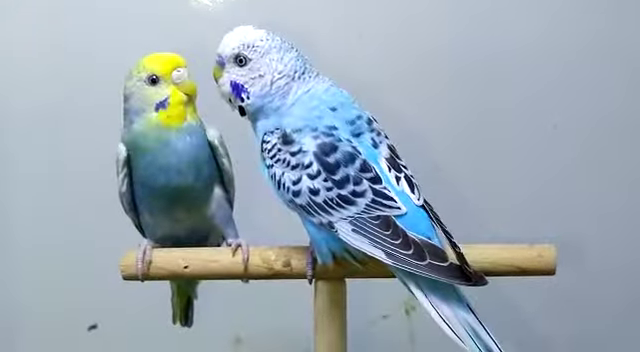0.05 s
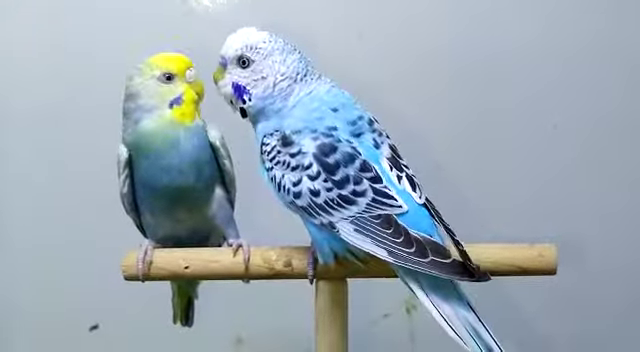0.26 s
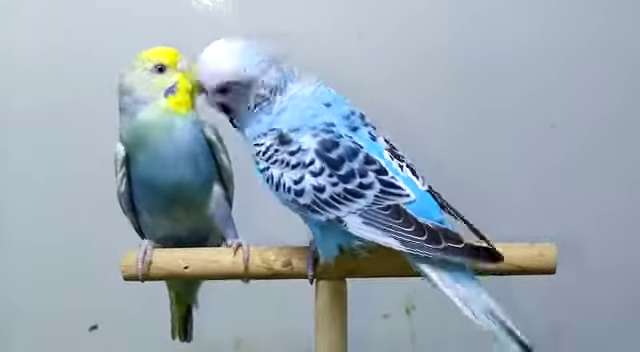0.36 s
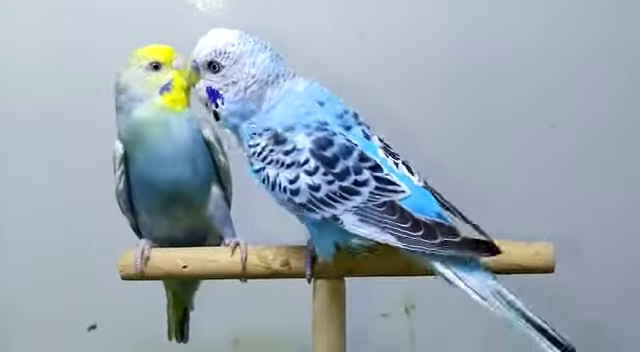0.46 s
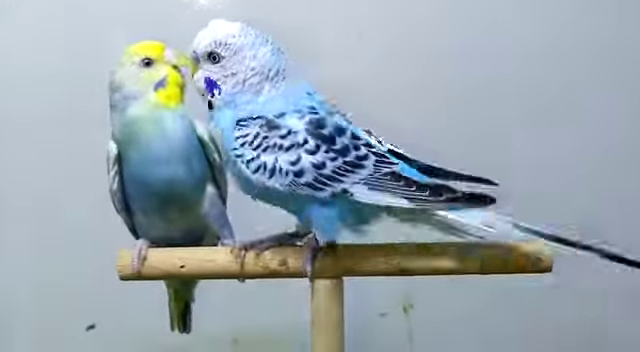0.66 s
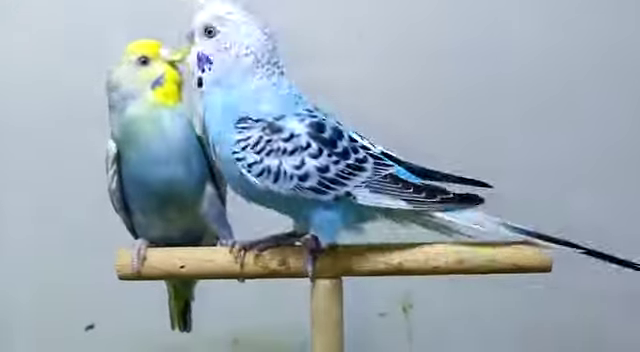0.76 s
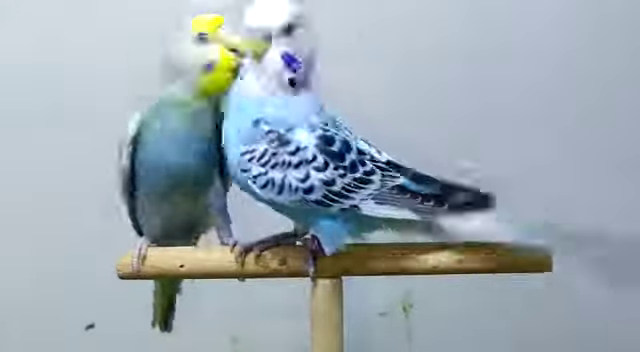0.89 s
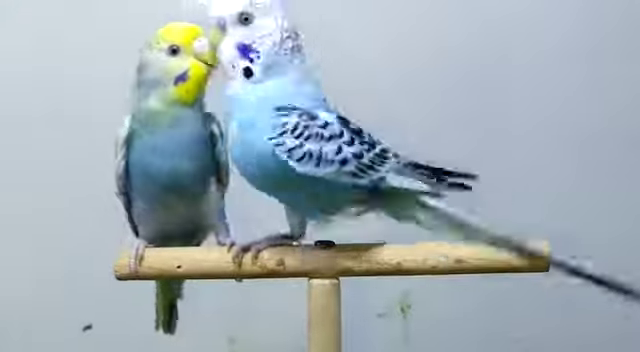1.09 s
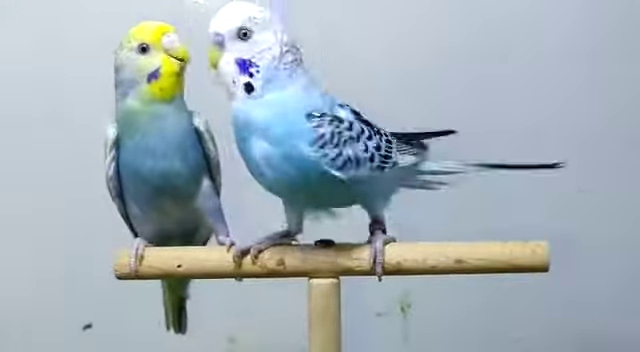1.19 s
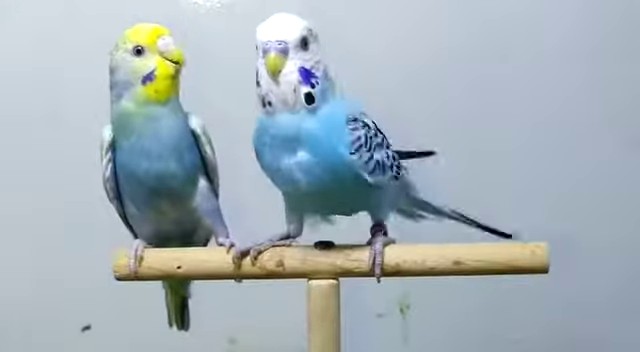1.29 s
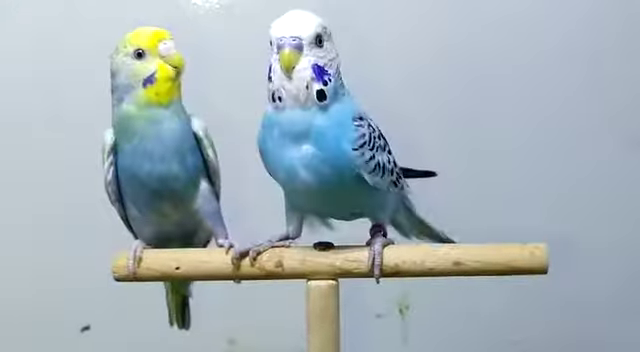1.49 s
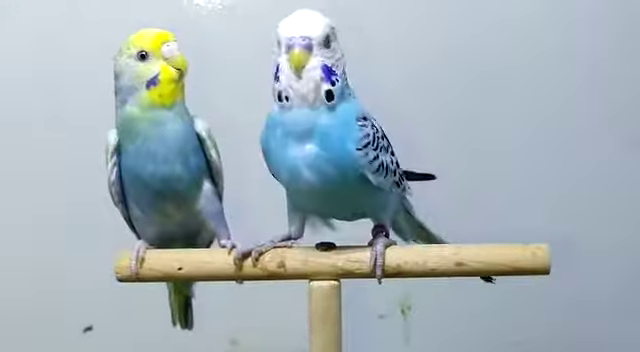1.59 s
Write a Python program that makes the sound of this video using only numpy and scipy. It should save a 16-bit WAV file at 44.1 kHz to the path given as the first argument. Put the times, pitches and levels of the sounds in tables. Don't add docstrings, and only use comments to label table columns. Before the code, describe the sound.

A budgerigar gives one short, loud, raspy warble up close, over low uneven wind-like rumble

```python
import sys
import numpy as np
from scipy import signal
from scipy.fft import rfft, irfft
from scipy.io import wavfile
from scipy.ndimage import uniform_filter1d

SR = 44100
rng = np.random.default_rng(int(sys.argv[2]) if len(sys.argv) > 2 else 0)


def boost_factor(decibels):
    exponent = np.asarray(decibels, float) / 20
    return 10 ** exponent


def wav_out(sig):
    wavfile.write(sys.argv[1], SR, np.round(np.clip(np.atleast_2d(sig).T, -1, 1) * 32767).astype(np.int16))


N = 72765
LEAD = SR // 4
M = N + LEAD


def slow(rate_hz):
    lowpass = signal.butter(2, rate_hz, fs=SR, output="sos")
    drift = signal.sosfilt(lowpass, rng.standard_normal(M + SR))[SR:]
    return drift / drift.std()


def at_hz(points, hz):
    p = np.array(points, float)
    return np.interp(np.log(np.maximum(hz, 1)), np.log(p[:, 0]), p[:, 1])


def coloured(x, points):
    return irfft(rfft(x) * boost_factor(at_hz(points, np.arange(M // 2 + 1) * SR / M)), M)


def noise(spectrum):
    hz = np.arange(N // 2 + 1) * SR / N
    x = irfft(rfft(rng.standard_normal((2, N))) * boost_factor(at_hz(spectrum, hz)), N)
    return x / x.std()


def pan(x, left_right_db):
    return x * boost_factor(np.array([[.5], [-.5]]) * left_right_db)


def voice(notes, voicing, attack_s, rasp_hz):
    flutter_hz, flutter_db, wobble = 150, 4, 0.012
    upper_fall_db, rasp_db = -19.5, -7.5
    swell_s, release_s = .003, 0.00081
    out, t = np.zeros((2, M)), (np.arange(M) - LEAD) / SR
    shake, flutter = slow(900), boost_factor(flutter_db * slow(flutter_hz))
    rasp_band = signal.butter(2, rasp_hz, "band", fs=SR, output="sos")
    rasp = signal.sosfilt(rasp_band, rng.standard_normal(M))
    for (start, length, hz0, hz1, db), (second_db, third_db, rough, pan_db) in zip(notes, voicing):
        on = slice(int((start - .01) * SR) + LEAD, int((start + length + .03) * SR) + LEAD)
        u, rough = t[on] - start, np.clip(rough, 0, 1)
        glide = np.interp(u, [0, length], [hz0, hz1])
        phase = 2 * np.pi * np.cumsum(glide * (1 + (wobble + 0.16 * rough ** 2) * shake[on])) / SR
        levels = [0, second_db, third_db, third_db + upper_fall_db, third_db + 2 * upper_fall_db]
        tone = np.zeros(len(u))
        for k, harmonic_db in enumerate(levels, 1):
            if k * hz0 < .36 * SR:
                tone += boost_factor(harmonic_db) * np.sin(k * phase)
        breath = rough * boost_factor(rasp_db + max(levels)) * rasp[on] * (1 + np.sin(phase))
        before = 0.38 * np.exp(np.minimum(u, 0) / swell_s)
        shape = np.where(u < 0, before, np.minimum(u / attack_s + 0.54, 1))
        shape = shape * np.exp(-np.maximum(u - length, 0) / release_s)
        out[:, on] += pan(np.sqrt(2) * boost_factor(db) * (tone * flutter[on] + breath) * shape, pan_db)
    return out


def near_warble():
    # start_s, length_s, start_pitch_hz, end_pitch_hz, level_db
    warble = [(.392, 0.015, 2761, 2801, -16), (.404, 0.0086, 2830, 3120, -21.5),
              (.412, 0.016, 3122, 3283, -20.5), (.428, 0.0065, 3350, 3520, -9.5),
              (.436, 0.005, 3880, 3750, -9), (.441, 0.014, 3460, 3305, -10), (.442, 0.012, 4490, 4400, -28),
              (.444, 0.011, 4030, 4230, -17.5), (.456, 0.015, 2755, 2890, -8.5),
              (.468, .013, 2808, 2624, -10.5), (.478, 0.0077, 4200, 3606, -16.5),
              (.479, 0.014, 4420, 4600, -29.5), (.483, 0.0074, 1908, 1704, -19),
              (.491, .01, 1759, 1810, -19.5), (.501, .015, 2614, 3052, -14.5),
              (.517, 0.022, 3160, 3182, -5), (.536, 0.0082, 3260, 3470, -8.5),
              (.547, 0.011, 3344, 3270, -4), (.55, 0.012, 4000, 4265, -16)]
    # second_harmonic_db, third_harmonic_db, roughness (0-1), left_right_db
    timbre = [(15.5, 5.5, .08, -8), (18.5, 14.5, .15, 0.5), (6, 0.5, 0.3, 7), (-17, -24, 0.6, 0),
              (6, -33, 0.6, -4.5), (-17.5, -33, 0.5, -1.5), (13, -31.5, 0.8, 2.5), (-4, -30, 0.5, 5.5),
              (-1, -16, 0.4, -1.5), (0.5, -3, 0.4, 2), (-11.5, -22.5, .55, -1.5), (15.5, -30, .35, -2.5),
              (9.5, -25.5, 0.33, 3), (10.5, -26.5, 0.3, 4), (-6.5, -7, 0.4, -1), (-17.5, -10.5, 0, -2.5),
              (-18.5, -11, 0.3, -4), (-15, -19, .55, 1), (-2.5, -28.5, 0.7, 2.5)]
    return voice(warble, timbre, attack_s=0.0024, rasp_hz=[1800, 14000])


def far_calls():
    # start_s, length_s, start_pitch_hz, end_pitch_hz, level_db
    calls = [(-.09, 0.094, 4360, 4830, -39.5), (-.06, 0.081, 1918, 3352, -43), (.09, 0.14, 1980, 2852, -49),
             (.13, 0.08, 3149, 3289, -41.5), (.195, 0.041, 2202, 1841, -44.5),
             (.795, 0.0568, 8350, 8790, -46.5), (.96, 0.047, 1100, 1416, -56),
             (1.061, 0.014, 1402, 1460, -44.5), (1.075, 0.043, 1624, 1703, -46),
             (1.14, 0.03, 1900, 2158, -48.5), (1.145, 0.069, 2910, 2977, -50.5),
             (1.19, 0.0717, 2248, 2298, -49.5), (1.27, 0.077, 2326, 2411, -52.5),
             (1.43, .03, 3900, 3626, -53.5), (1.452, .036, 3637, 3118, -39.5),
             (1.5, 0.054, 3500, 3060, -44), (1.55, 0.12, 2720, 2083, -47)]
    # second_harmonic_db, third_harmonic_db, roughness (0-1), left_right_db
    timbre = [(-32, -21, 0.8, -1.5), (-6.5, 7, 0.09, 0.5), (-22.5, -28.5, 0.5, 0), (-35, -32.5, 0.4, -3),
              (-24, -31, 0, 3), (-40, -40, 0.29, 4), (-36, -33, 0.91, 1), (-48, -18, 0.04, 5),
              (-35.5, -20.5, 0.08, 4), (-12, -19.5, 0.34, 10), (-37, -28, 0.34, 0.5), (-24, -17.5, 0.39, 5),
              (-16, -28.5, 0.24, 0.5), (-5, -29, 0.77, 3), (-14, -14.5, 0.35, -3), (-13, -12.5, .6, -2),
              (-14, -4, 0.8, 2)]
    # low_hz, high_hz
    rasp_band_hz = [1900, 4700]
    return voice(calls, timbre, attack_s=.008, rasp_hz=rasp_band_hz)


def ring(clicks, hz, t60_s):
    r, w = boost_factor(-60 / (t60_s * SR)), 2 * np.pi * hz / SR
    return signal.lfilter([0, np.sin(w)], [1, -2 * r * np.cos(w), r * r], clicks + 1e-18)


def claws():
    # start_s, tick_peak_db, hollow_knock_db
    touches = [
        (.311, -36.5, -73),
        (.647, -52, -36),
        (0.951, -46, -62),
        (0.971, -42, -55),
        (.998, -50.5, -64),
        (1.025, -46, -54.5),
        (1.122, -34, -73),
        (1.168, -37, -37.5),
        (1.21, -47, -46),
    ]
    # mode_hz, level_db, t60_s
    perch_modes = [(487, 1.5, 0.13), (875, 6, 0.035), (1100, -2.5, .025), (650, 4.5, .03)]
    tick_s, tick_hz = 0.0031, 4970
    claw_hz, claw_db, claw_t60_s = 12830, -4.5, 0.026
    out, t = np.zeros(M), (np.arange(M) - LEAD) / SR
    highpass = signal.butter(2, tick_hz, "high", fs=SR, output="sos")
    hiss = signal.sosfilt(highpass, rng.standard_normal(M))
    for start, tick_db, knock_db in touches:
        click = np.arange(M) == int(start * SR) + LEAD
        out += boost_factor(tick_db) * hiss * (t >= start) * np.exp(-np.maximum(t - start, 0) / tick_s)
        out += ring(boost_factor(tick_db + claw_db) * click, claw_hz, claw_t60_s)
        for hz, db, t60_s in perch_modes:
            out += boost_factor(db) * ring(boost_factor(knock_db) * click, hz, t60_s)
    return out


def ports(x):
    # frequency_hz, left_right_db
    balance = [(1800, 6.5), (2800, -2), (3200, -8.5), (3500, -11.5), (4000, 3), (5500, 10.5), (6400, 4.5),
               (8000, 6.5), (9500, -1.5)]
    left_leads_s = 0.0004753
    hz = np.arange(M // 2 + 1) * SR / M
    delay = np.exp(-2j * np.pi * hz * np.array([[0], [left_leads_s]]))
    return irfft(pan(rfft(x), at_hz(balance, hz)) * delay, M)


def room(x):
    # frequency_hz, t60_s
    decay = [(500, 0.81), (3000, 0.7), (8000, 0.66), (10000, 0.73), (11500, 0.06)]
    dip_hz, dip_db, dip_width_hz = 5550, -7, 400
    t, tail = np.arange(SR) / SR, 0
    edges_hz = 280 * 2. ** np.arange(0, 6.1, .5)
    white = rng.standard_normal((2, 2, SR))
    for k, (low, high) in enumerate(zip(edges_hz, edges_hz[1:])):
        bandpass = signal.butter(2, [low, high], "band", fs=SR, output="sos")
        t60_s = at_hz(decay, np.sqrt(low * high))
        tail = tail + signal.sosfilt(bandpass, white[k % 2]) * boost_factor(-60 * t / t60_s)
    dip = np.exp(-((np.arange(SR // 2 + 1) - dip_hz) / dip_width_hz) ** 2)
    onset = np.clip(t / 0.0027 - .3, 0, 1)
    tail = irfft(rfft(tail) * boost_factor(dip_db * dip), SR) * onset
    return signal.fftconvolve(x, tail / np.sqrt(np.sum(tail ** 2) / 2), axes=1)[:, :M]


def feathers():
    # time_s, level_db
    movement = [(0.299, -103), (0.318, -55), (.39, -54), (.42, -77), (.78, -60), (0.822, -41.5), (.93, -47),
                (1.12, -47), (1.2, -46), (1.3, -61.5), (1.4, -100)]
    # frequency_hz, density_db (dB per Hz)
    plumage = [(3500, -32), (6000, -21), (6700, -17), (7400, -20), (8600, -1), (10200, -14.5), (12300, -14),
               (16000, -22.5)]
    level_db = np.interp(np.arange(N) / SR, *np.transpose(movement))
    return noise(plumage) * boost_factor(level_db + 2.0 * slow(40)[:N])


def draught():
    # time_s, level_db, left_right_db
    strength = [(0.0, -38, 16), (0.214, -22, 15.5), (0.258, -33, 8), (0.436, -17, 31), (0.472, -20.5, 21),
                (0.52, -7, 27), (0.641, -41, 0), (0.89, -32, 0), (1.034, -36.5, -27), (1.118, -24.5, 19.5),
                (1.308, -25, 10), (1.368, -20, 31), (1.413, -35, 10.5), (1.626, -30, 10.5),
                (1.65, -28.5, 8)]
    # frequency_hz, density_db (dB per Hz)
    buffet = [(12, -50), (20, -48.5), (74, -0.5), (146, -2), (186, -6.5), (315, -18.5), (412, -27),
              (687, -54.5), (900, -75), (1170, -59), (1980, -120)]
    # time_s, peak_db, pitch_hz
    gusts = [(0.123, -7.5, 139), (0.152, -14, 106), (0.203, -4, 150), (0.231, -15, 150), (0.301, -16, 117),
             (0.342, -10, 150), (0.373, -26, 150), (0.428, 9, 161.3), (0.453, -4.5, 132),
             (0.497, -3.5, 203.7), (0.52, -25, 128.7), (0.542, -9, 115.2), (0.872, -9, 150),
             (0.917, -12.5, 192.3), (1.127, -9.5, 128.7), (1.153, -10.5, 88), (1.216, -14, 165),
             (1.276, -9.5, 95), (1.314, -20.5, 150), (1.367, -5, 160), (1.388, -10.5, 116),
             (1.498, -13.5, 119.3), (1.529, -8, 132), (1.577, -13, 118.5), (1.615, -7.5, 191),
             (1.642, -44, 149),
             (0.796, -16.5, 150),
        (1.291, -13, 134),
        (1.352, -4.5, 150),
        (1.436, -12.5, 138),
    ]
    lump_db, lumps_hz, trim_db = 3.0, 24.7, -1
    gust_cycles, gust_trim_db = 0.6, 0.5
    ceiling = .8
    t, (time_s, db, pan_db) = np.arange(N) / SR, np.transpose(strength)
    left_db = np.interp(t, time_s, db - 10 * np.log10(.25 + .25 * boost_factor(-2 * pan_db)))
    right_db = left_db - np.interp(t, time_s, pan_db)
    lumps = lump_db * np.array([slow(lumps_hz)[:N], slow(lumps_hz)[:N]])
    out = noise(buffet) * boost_factor(np.array([left_db, right_db]) + lumps + trim_db)
    for peak_s, peak_db, hz in gusts:
        u = (t - peak_s) * hz
        swell = np.exp(-np.abs(u / gust_cycles) ** 2)
        out[0] -= boost_factor(peak_db + gust_trim_db) * np.cos(2 * np.pi * u) * swell
    return ceiling * np.tanh(out / ceiling)


def hush():
    # frequency_hz, density_db (dB per Hz)
    floor_colour = [(180, -37.5), (300, -5), (814, -14.5), (2930, -13), (3760, -35), (8790, -6),
                    (11100, -34), (13000, -23), (16000, -20)]
    return boost_factor(-51) * noise(floor_colour)


def scene():
    # frequency_hz, level_db
    near_to_room = [(1800, -15.5), (2200, -10), (3300, -23), (4400, -13.5), (5550, -21), (7000, -17),
                    (9500, -17.5), (11500, -23)]
    far_direct_db = -2.5
    near, far = near_warble() + claws(), far_calls()
    birds = ports(near) + boost_factor(far_direct_db) * far + room(coloured(near, near_to_room) + far)
    return birds[:, LEAD:] + feathers() + hush() + draught()


def gate(x):
    # frequency_hz, threshold_db
    threshold = [(2800, -82), (3900, -82), (4600, -84), (5500, -81), (6500, -84), (9500, -84), (11000, -80),
                 (14000, -87)]
    depth_db = -30
    hz, _, z = signal.stft(x, SR, nperseg=1024)
    power = np.mean(np.abs(z) ** 2, axis=0)
    power = uniform_filter1d(uniform_filter1d(power, size=3, axis=0), size=5, axis=1)
    level_db = 10 * np.log10(power + 1e-20)
    shut = np.clip(at_hz(threshold, hz)[:, None] - level_db, 0, 1) * (hz[:, None] > threshold[0][0])
    return signal.istft(z * boost_factor(depth_db * shut), SR, nperseg=1024)[1][:, :N]


def roll_off(x):
    return signal.sosfilt(signal.butter(12, 20000, fs=SR, output="sos"), x)


def record(dry):
    ceiling, knee, cutoff_hz = 1.0, 34, 15800
    limited = dry / (1 + np.abs(dry / ceiling) ** knee) ** (1 / knee)
    lowpass = signal.cheby2(8, 30, cutoff_hz, fs=SR, output="sos")
    mix = signal.sosfilt(lowpass, gate(limited))
    return roll_off(mix)


dry = scene()
out = record(dry)
wav_out(out)
```